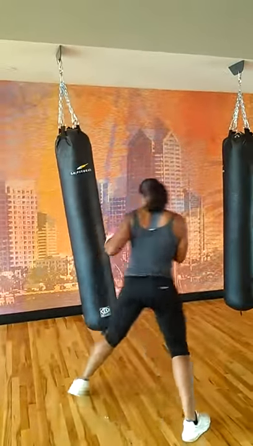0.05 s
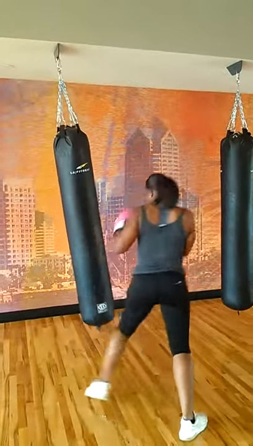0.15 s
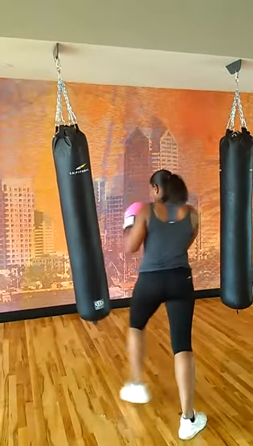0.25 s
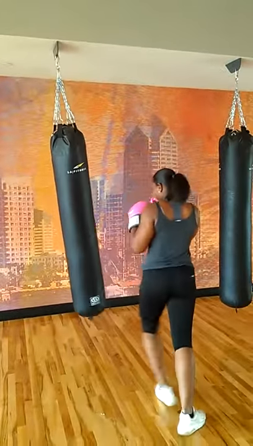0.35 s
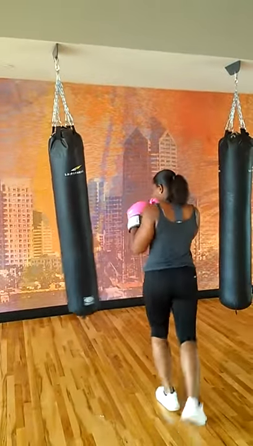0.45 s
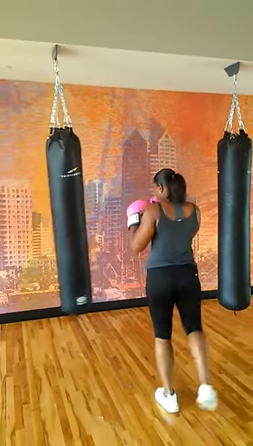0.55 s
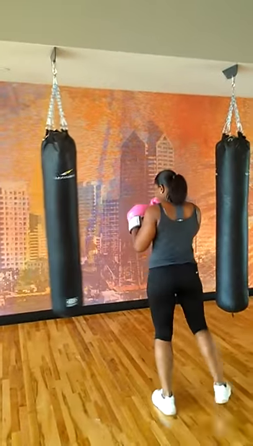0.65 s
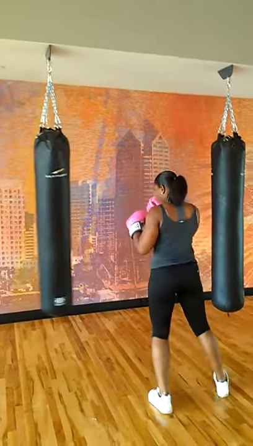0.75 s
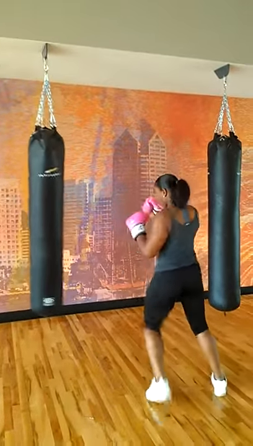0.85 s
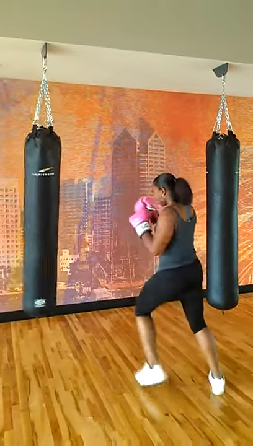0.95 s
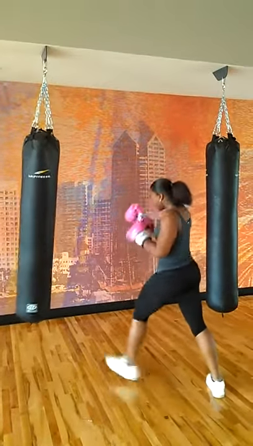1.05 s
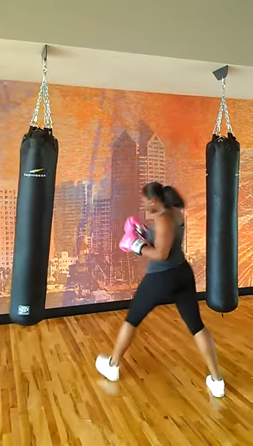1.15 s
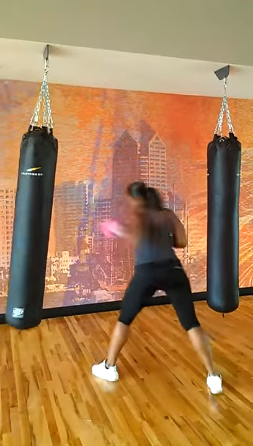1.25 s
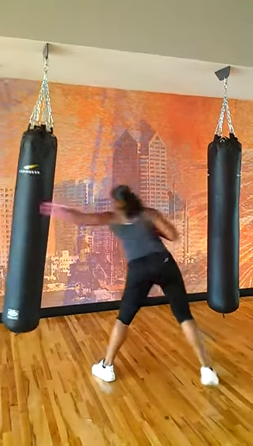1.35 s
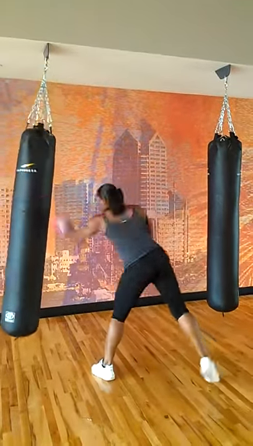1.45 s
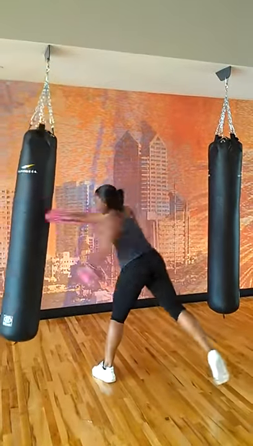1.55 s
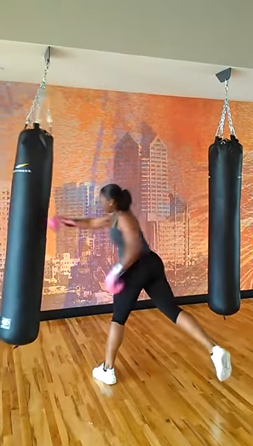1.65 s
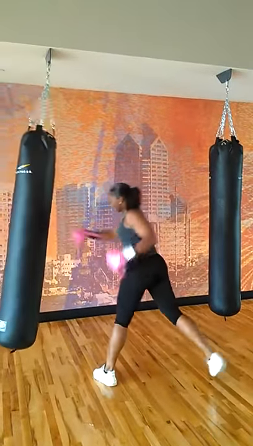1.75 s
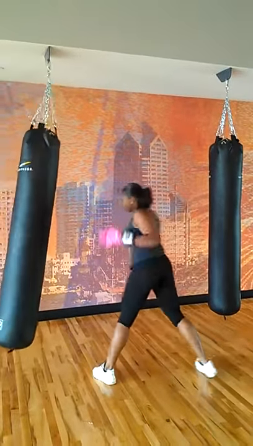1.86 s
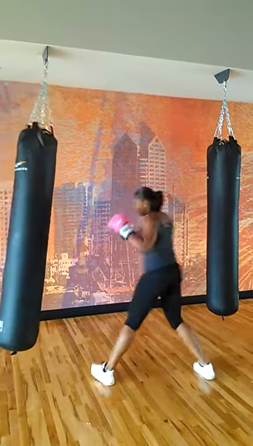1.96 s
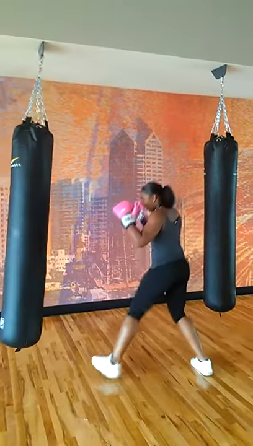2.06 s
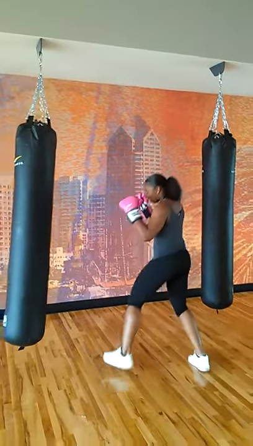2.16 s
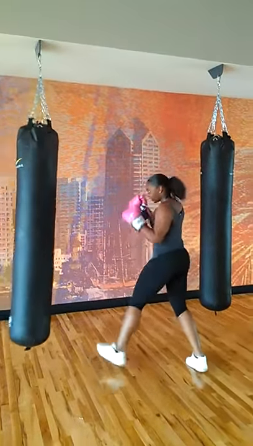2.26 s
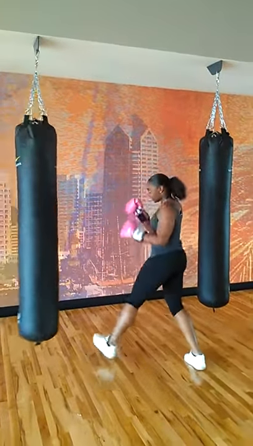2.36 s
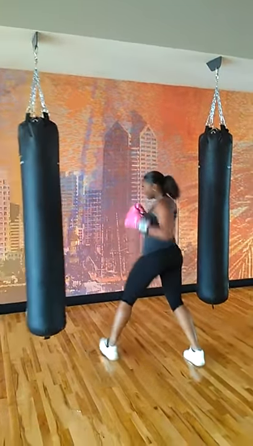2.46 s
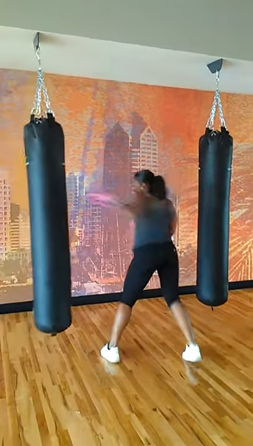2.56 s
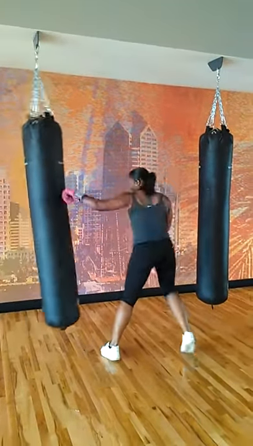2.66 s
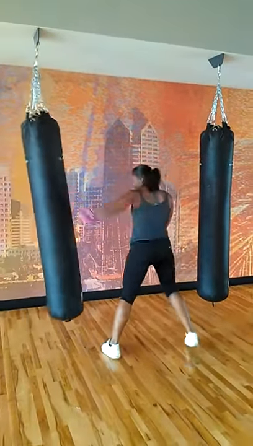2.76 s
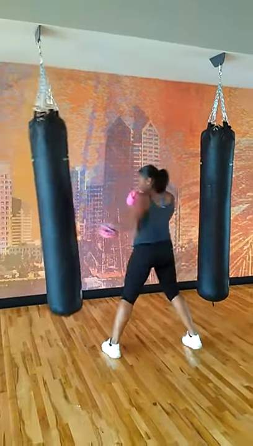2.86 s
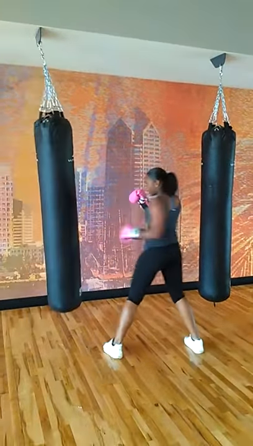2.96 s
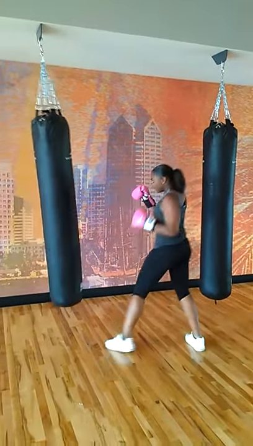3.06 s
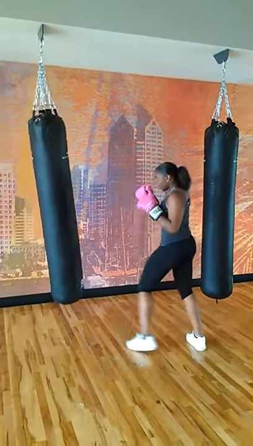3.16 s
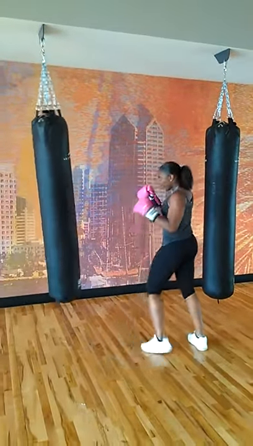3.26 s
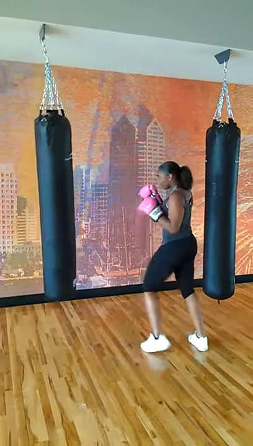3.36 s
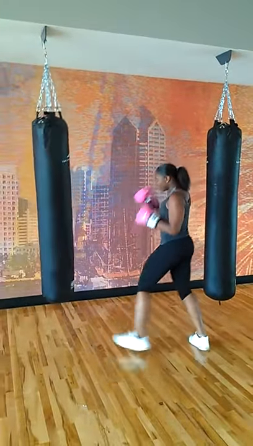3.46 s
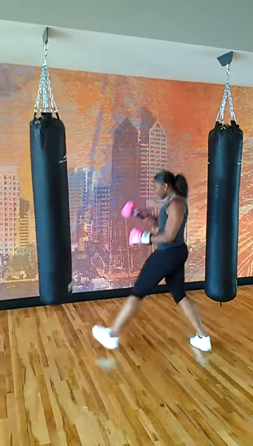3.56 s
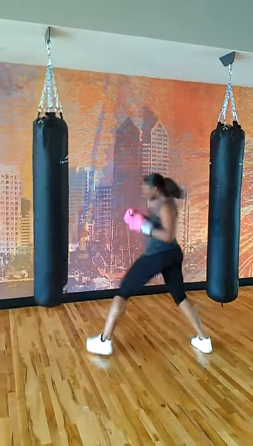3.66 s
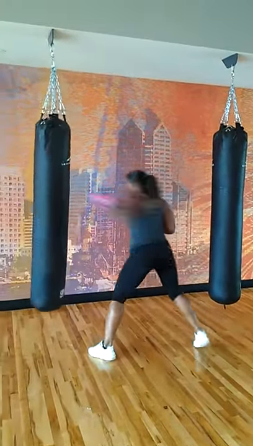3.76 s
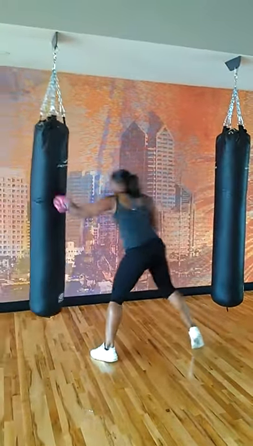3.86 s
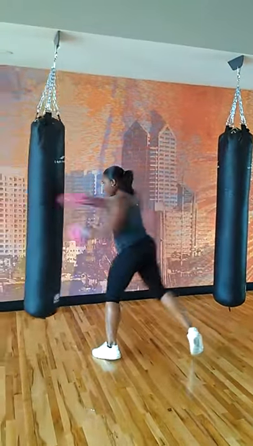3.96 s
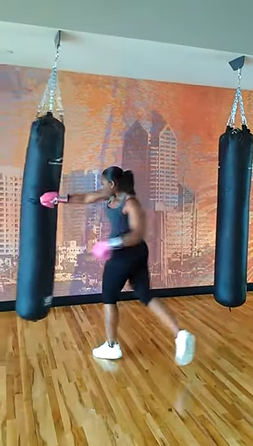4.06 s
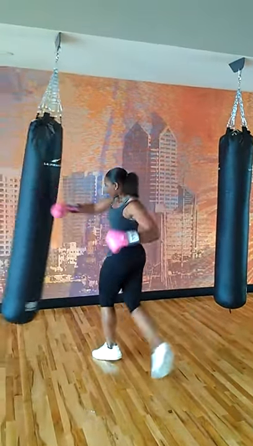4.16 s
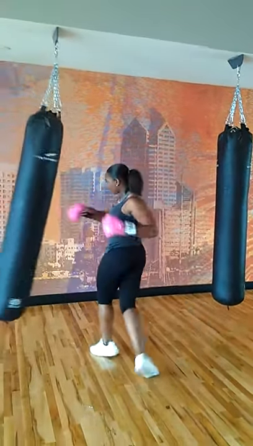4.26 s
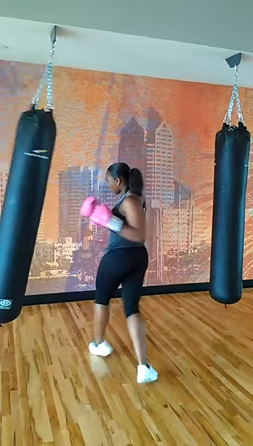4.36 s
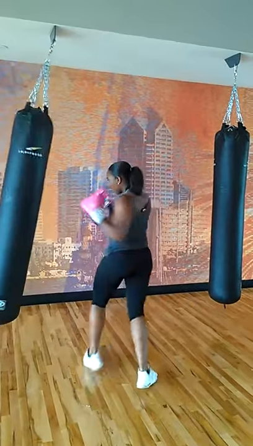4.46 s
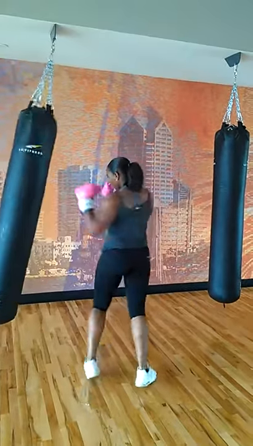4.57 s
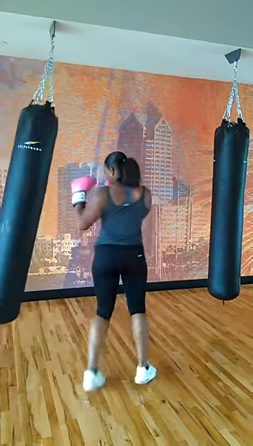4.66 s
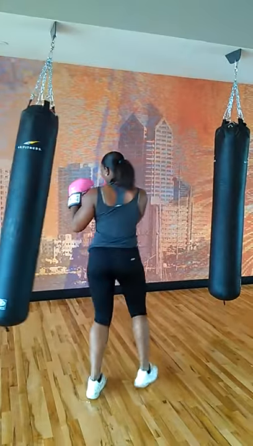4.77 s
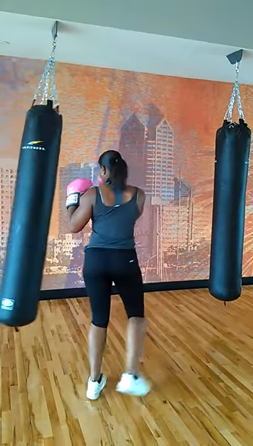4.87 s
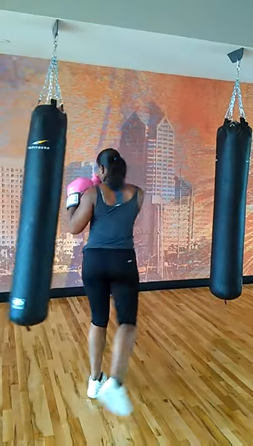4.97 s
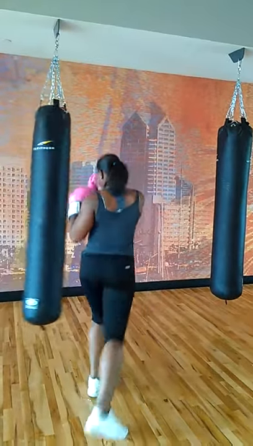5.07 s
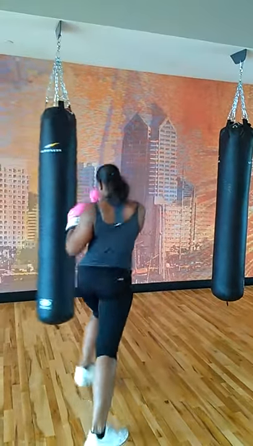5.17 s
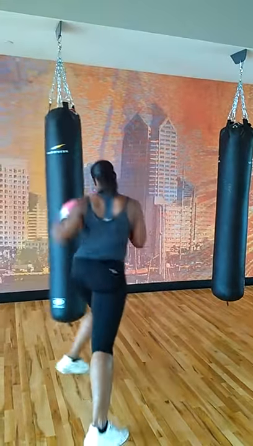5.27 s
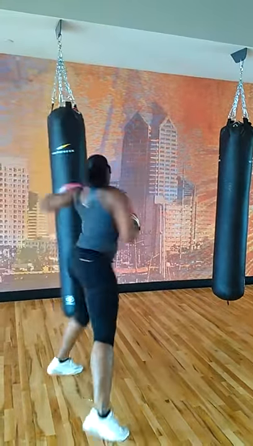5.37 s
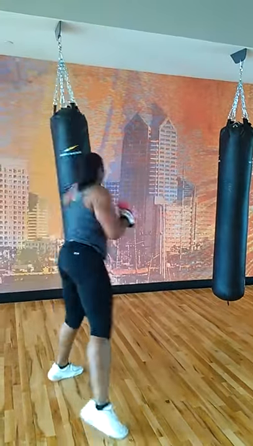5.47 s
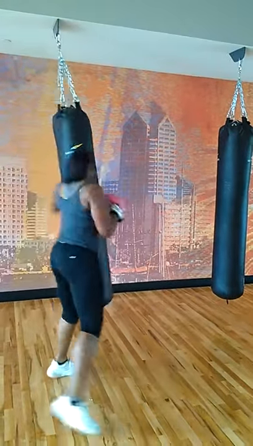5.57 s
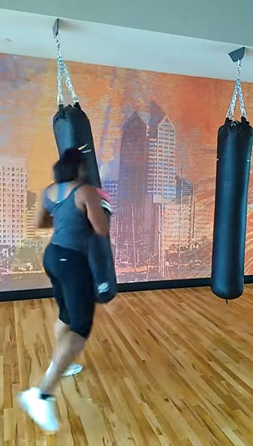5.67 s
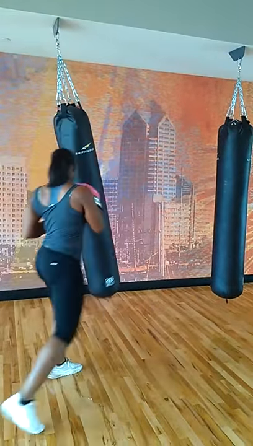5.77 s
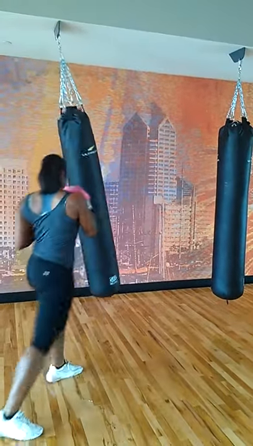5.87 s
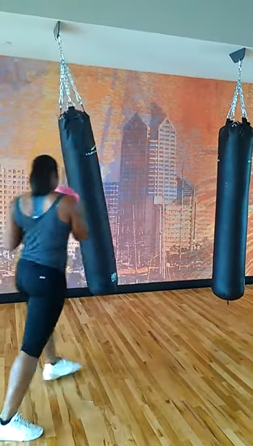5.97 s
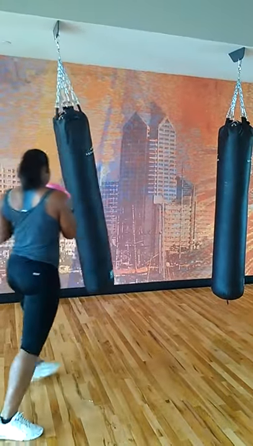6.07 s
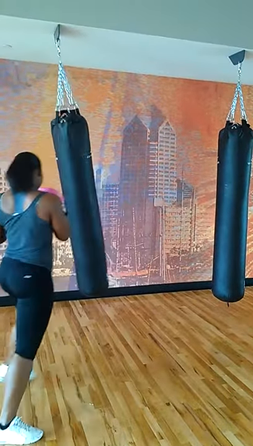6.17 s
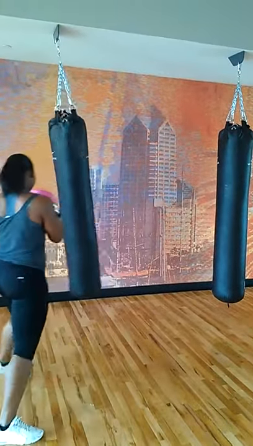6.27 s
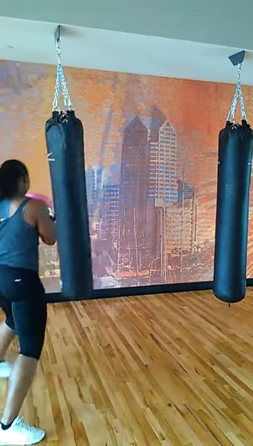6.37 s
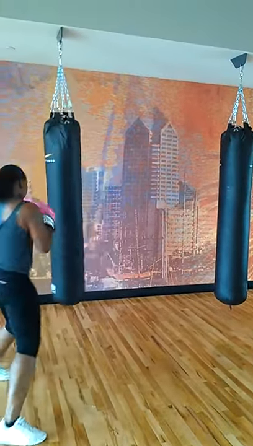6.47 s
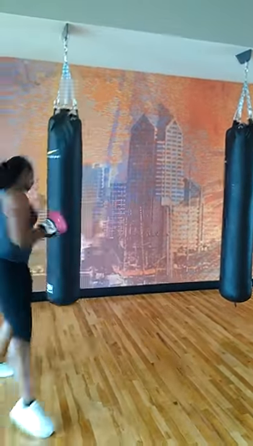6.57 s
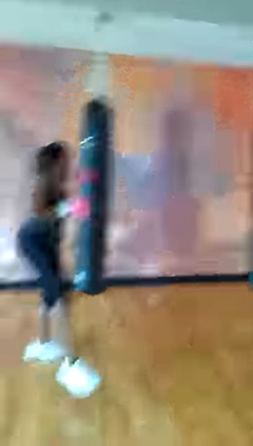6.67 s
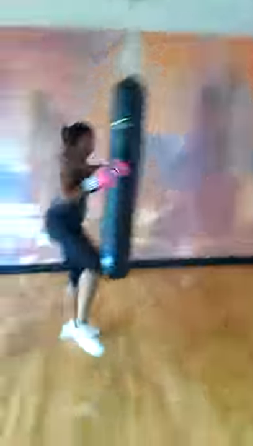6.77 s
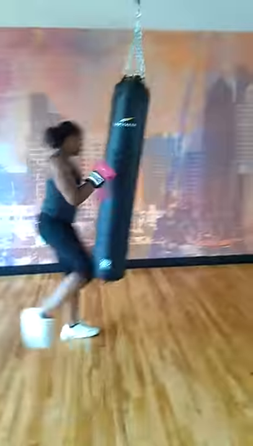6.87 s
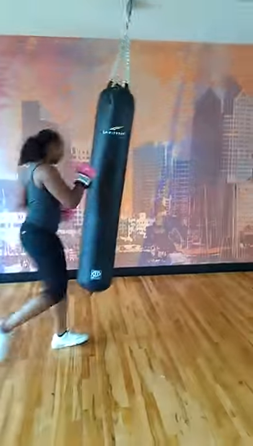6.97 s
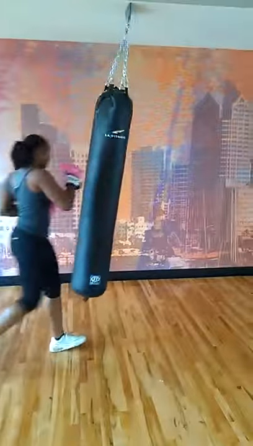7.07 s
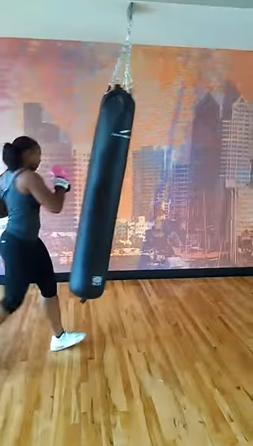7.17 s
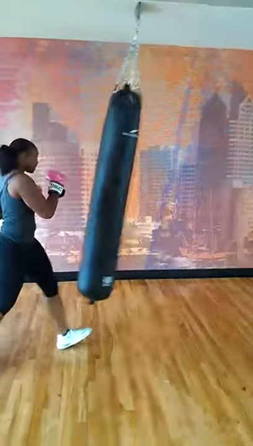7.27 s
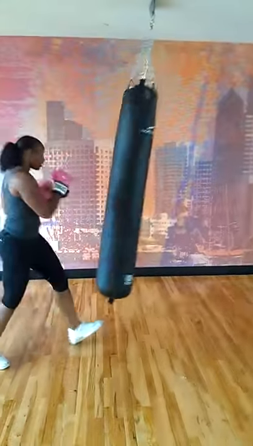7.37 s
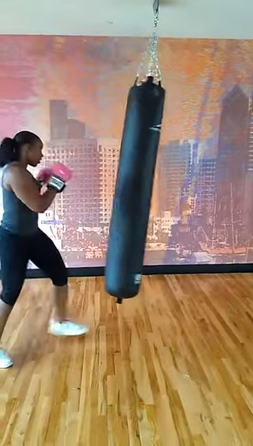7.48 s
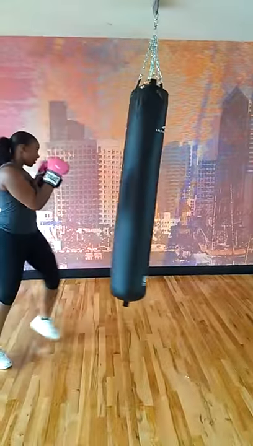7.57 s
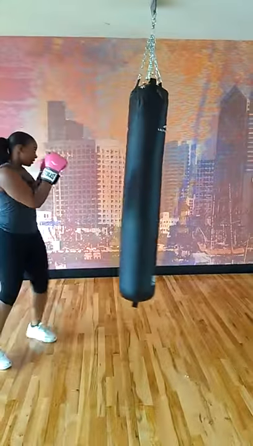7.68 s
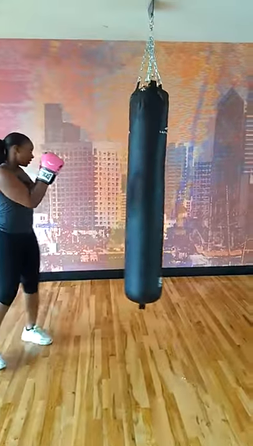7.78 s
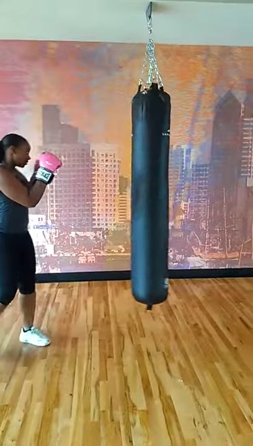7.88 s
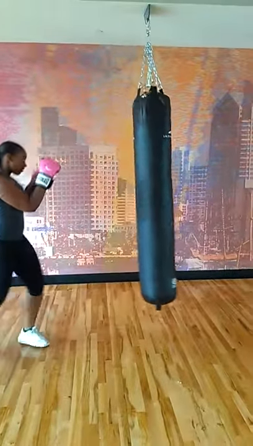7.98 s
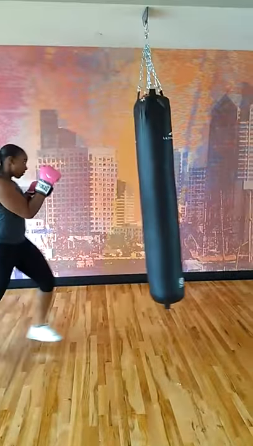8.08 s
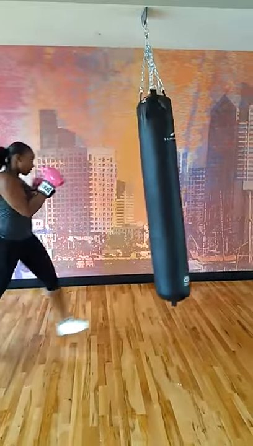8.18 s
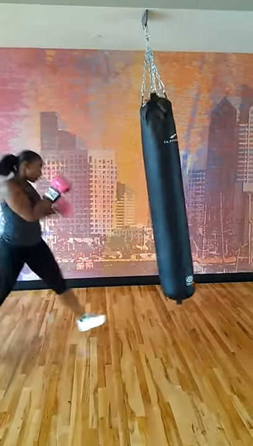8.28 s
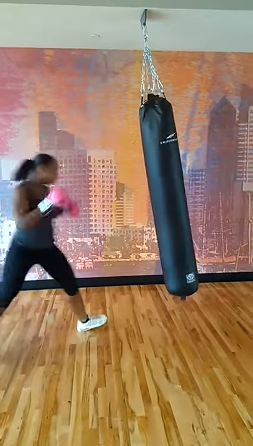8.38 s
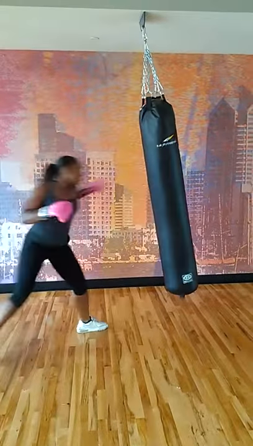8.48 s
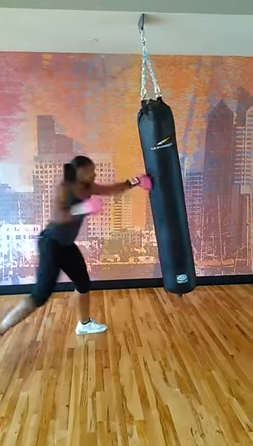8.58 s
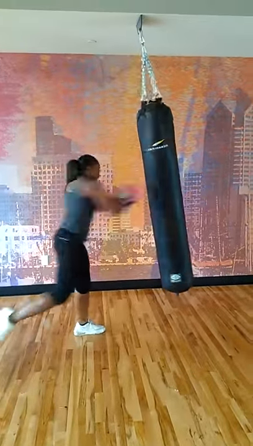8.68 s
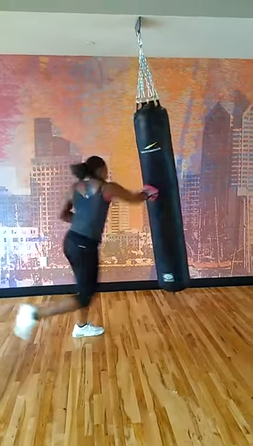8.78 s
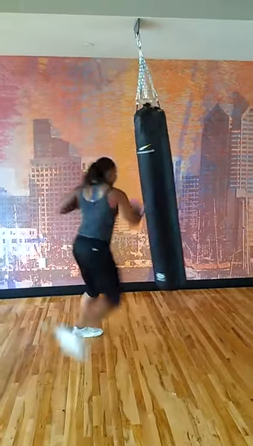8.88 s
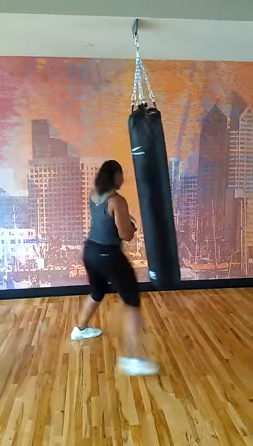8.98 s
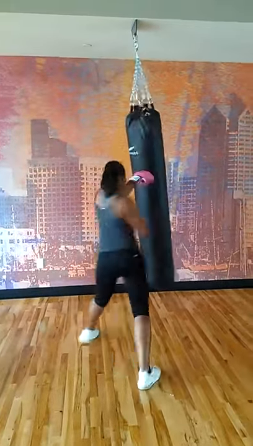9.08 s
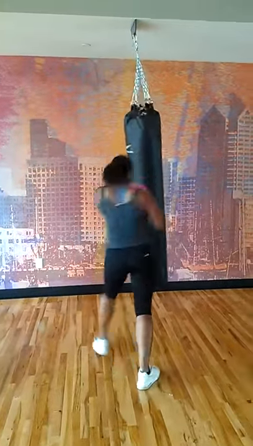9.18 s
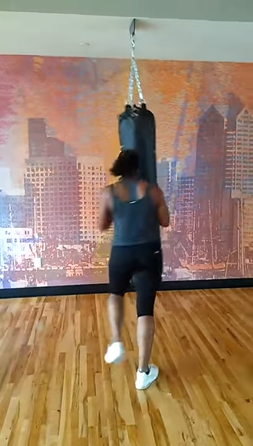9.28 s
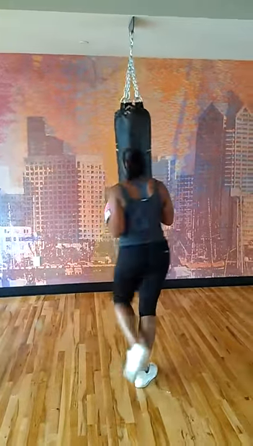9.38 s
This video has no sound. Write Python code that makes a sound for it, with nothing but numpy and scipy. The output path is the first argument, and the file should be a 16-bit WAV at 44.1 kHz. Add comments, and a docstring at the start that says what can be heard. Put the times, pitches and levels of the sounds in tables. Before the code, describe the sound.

A bare, hard-walled gym with a wooden floor, heard in wide stereo from a phone a few metres away. At the start the tail of an earlier blow dies away, with faint chain chafing and a light scuff. Soft steps around 1.2 lead to a quick double punch at 1.4 and 1.6. A firmer single lands at 2.65, chains rattling at 2.95. Steps, scuffs and toe taps from 3.1 to 3.8 precede the hardest, loudest blow at 3.87, its cover creasing afterwards and chains ticking near 4.4. A slide at 4.9, then another hit at 5.47. A tiny high sole squeak at 6.44, then a strong smack at 6.73. A quieter break holds sparse steps and a scuff near 8.0, before a lighter flurry at 8.6, 8.77 and 9.06. Each punch is slap, thud, crunch and springy rebound, with clothes rustling.

```python
"""A boxer punches a hanging heavy bag in a bare gym with a wooden floor, a few metres from a phone.
The gym still rings from an earlier blow; the chains tick and chafe as the bag swings, soles scuff and step.
Each blow then slaps the vinyl, thuds into the bag, crunches its filling and springs back, amid rustling clothes.
Between blows toes tap, the cover creases and, later on, one sole squeaks.
Sources are shaped noise or tones; hard walls throw them back and the phone widens the stereo image."""
import sys
import numpy as np
from scipy import signal
from scipy.fft import rfft, irfft, next_fast_len
from scipy.io import wavfile
from scipy.ndimage import uniform_filter1d

SR = 44100
rng = np.random.default_rng(int(sys.argv[2]) if len(sys.argv) > 2 else 0)


def unload_audio(sound):
    """Save the sound as a 16-bit wav file, at the path given as the first command line argument."""
    columns = np.transpose(np.atleast_2d(sound))
    # keep every value between -1 and 1, then stretch to whole-number steps
    steps = np.round(np.clip(columns, -1, 1) * 32767)
    wavfile.write(sys.argv[1], SR, steps.astype(np.int16))


N = 416304
LEAD = SR  # samples; the scene starts a second early, so the room already rings
SPOTS = 4  # sounding places, each with its own path through the room

# gloves hitting the bag: start_s, slap_db, thud_db, crunch_db
PUNCHES = [(-.5, 13.5, 4, 11), (1.4212, 9, 1.5, 13), (1.604, 10.5, -8.5, 0), (2.6478, 13.5, 5.5, 17),
           (3.865, 17, 12, 20), (5.465, 10.5, 2, 17.5), (6.729, 15.5, 3.5, 17.5), (8.606, 9, 1.5, 0),
           (8.767, 11.5, -5.5, 9.5), (9.061, 6, 0.5, 7)]


def amp(db):
    """Decibels to gain."""
    return 10 ** (np.asarray(db) / 20)


def unit(x):
    """Scale to an energy of one."""
    return x / np.sqrt(np.sum(x ** 2))


def gains(points, size):
    """Gain at each transform bin of a (freq_hz, level_db) spectrum, interpolated over log frequency."""
    hz, db = np.transpose(points)
    bin_hz = np.arange(size // 2 + 1) * SR / size
    return amp(np.interp(np.log(bin_hz + 1), np.log(hz), db))


def shade(x, points):
    """Filter by a spectrum without shifting phase."""
    size = 2 * next_fast_len(len(x) // 2 + 2048, True)
    return irfft(rfft(x, size) * gains(points, size), size)[:len(x)]


def colour(x, points, size=2048):
    """Causal minimum-phase filter of unit energy, so attacks stay sharp."""
    cepstrum = irfft(np.log(gains(points, size)))
    # fold the cepstrum onto positive time
    cepstrum[1:size // 2] *= 2
    cepstrum[size // 2 + 1:] = 0
    response = unit(irfft(np.exp(rfft(cepstrum))))
    return signal.oaconvolve(np.atleast_2d(x), response[None], axes=1)[:, :x.shape[-1]]


def add(track, start_s, sound):
    """Mix a sound into a track at its time."""
    i = LEAD + int(start_s * SR)
    track[i:i + len(sound)] += sound[:len(track) - i]


def grains(swell_s, decay_s, spread_db, patchy_db=0):
    """Tiny clicks of uneven size that swell and die away, optionally bunched into patches of milliseconds."""
    t = np.arange(SR // 3) / SR
    envelope = np.minimum(t / swell_s, 1) * np.exp(-np.maximum(t - swell_s, 0) / decay_s)
    sizes = amp(spread_db * np.minimum(rng.exponential(size=len(t)), 5))
    patches = uniform_filter1d(rng.standard_normal(len(t)), size=128)
    patch_gain = amp(patchy_db * patches / patches.std())
    return unit(envelope * sizes * patch_gain * rng.standard_normal(len(t)))


def bursts(events, swell_share, spread_db):
    """A burst of small contacts for each event; its swell is a share of its decay."""
    track = np.zeros(LEAD + N)
    for s, db, decay_s in events:
        add(track, s, amp(db) * grains(swell_share * decay_s, decay_s, spread_db))
    return track


def scatter(track):
    """Share samples at random among several spots on the bag or floor, one row a spot."""
    spot_of_sample = rng.integers(SPOTS, size=len(track))
    return track * (spot_of_sample == np.arange(SPOTS)[:, None])


def room_hush():
    """Faint air of the room: steady coloured noise."""
    # freq_hz, level_db
    hush_spectrum = [(30, -12), (140, -12), (270, 0), (1000, -6), (2000, -7), (3000, -11), (9000, -14),
                     (13000, -28)]
    return amp(-86) * colour(rng.standard_normal(N), hush_spectrum)[0]


def chains():
    """Steel links tick on each other; after each blow they chafe in one narrow ring as the bag swings."""
    # chains snatching at their hook: start_s, level_db, decay_s
    snatches = [(.135, -26, 0.05), (1.88, -18, 0.031), (2.93, 0.5, 0.034), (2.955, -2.5, 0.031),
                (2.974, -3, .0038), (4.353, -9.5, .003), (4.48, -16, 0.087), (4.855, -21, .025),
                (5.768, -12.5, .015), (5.795, -7.5, 0.0024), (6.012, -23.5, 0.0074)]
    # links, then ring of the hook: freq_hz, level_db
    link_spectrum = [(60, -47), (170, -18), (350, -3), (1400, -3.5), (2200, 4.5), (3000, -10.5),
                     (6000, -1.5), (7000, -2), (7900, 7), (9500, -1), (13000, -22)]
    hook_spectrum = [(1200, -46), (1800, -16), (2050, 1.5), (2350, -2), (2700, -23), (4000, -51)]
    chafe_db, chafe_t60_s = -71, 1.49  # level against the crunch; time to fall 60 dB
    chafing, t = np.zeros(LEAD + N), np.arange(3 * SR) / SR
    slowing = np.exp(-np.log(1000) * (t / chafe_t60_s) ** 2)
    for s, _, _, crunch_db in PUNCHES:
        add(chafing, s, amp(chafe_db + crunch_db) * slowing * rng.standard_normal(len(t)))
    ticks = bursts(snatches, swell_share=0.66, spread_db=4.0)
    return colour(scatter(ticks), link_spectrum) + colour(scatter(chafing), hook_spectrum)


def clothes():
    """Clothes and gloves rustle from each wind-up until the boxer settles, louder for heavy thuds."""
    rustle_db, rustle_db_per_thud_db = -71, .9
    wind_up_s, settle_s, fade_db_per_s = .19, .9, 89.5
    t = np.arange(-LEAD, N) / SR
    effort = np.zeros(len(t))
    for s, _, thud_db, _ in PUNCHES:
        resting_s = np.maximum(np.maximum(s - wind_up_s - t, t - s - settle_s), 0)
        level_db = rustle_db + rustle_db_per_thud_db * thud_db - fade_db_per_s * resting_s
        effort = np.maximum(effort, amp(level_db))
    return effort * rng.standard_normal(len(t))


def footwork():
    """Soles slide, steps roll and toes tap on the boards; clothes rustle with the colour of the soles."""
    # soles sliding over the varnish: start_s, level_db, decay_s
    scuffs = [(.435, -29, .03), (1.232, -32.5, .028), (2.245, -28, .02), (3.21, -12, .02),
              (3.577, -18.5, .015), (4.92, -27, .15), (6.232, -28.5, .029), (8.034, -16, .007),
              (8.058, -16, .055)]
    # sneakers landing and rolling: start_s, level_db, decay_s
    steps = [(1.12, -40.5, .1), (1.2, -30, .09), (1.975, -16.5, 0.0096), (2.52, -25.5, 0.086),
             (3.14, -9, 0.058), (3.31, -15.5, 0.14), (3.576, -14.5, .07), (5.145, -20, 0.075),
             (6.43, -19.5, .11), (7.28, -23.5, 0.018), (7.878, -14, 0.084), (8.48, -28.5, 0.13)]
    # toes on the boards: start_s, level_db
    taps = [(3.727, -8.5), (3.76, -12.5), (5.356, -25.5), (6.43, -30), (9.008, -13)]
    # sliding sole, boards, hollow knock of a toe: freq_hz, level_db
    sole_spectrum = [(120, -21), (300, 4), (800, 0.5), (2200, 2), (3200, 0.5), (5500, -2), (9000, -2),
                     (12500, -21)]
    board_spectrum = [(90, -37.5), (190, -14.5), (300, 5), (500, -0.5), (780, 7), (1200, 0), (1700, -0.5),
                      (2200, 8), (2800, -4.5), (5000, -5), (9000, -5.5), (13000, -32)]
    toe_spectrum = [(150, -23.5), (400, -5), (900, 5), (1600, -1.5), (3700, -3.5), (5000, -10.5),
                    (12000, -26)]
    tap_decay_s, step_swell = .004, 0.21
    rubbing = bursts(scuffs, swell_share=.25, spread_db=1.5) + clothes()
    rolling = bursts(steps, step_swell, spread_db=7.5)
    tapping = bursts([(s, db, tap_decay_s) for s, db in taps], step_swell, spread_db=7.5)
    sliding_spots = colour(scatter(rubbing), sole_spectrum)
    step_spots = colour(scatter(rolling), board_spectrum)
    tap_spots = colour(scatter(tapping), toe_spectrum)
    return sliding_spots + step_spots + tap_spots


def squeeze():
    """The padding stiffens as it is crushed, so its rough hollow note climbs quickly."""
    start_hz, octave_s, attack_s, climb_s, decay_s = 330.4, .0145, 0.012, .038, 0.0053
    t = np.arange(SR // 8) / SR
    hz = start_hz * 2 ** (np.minimum(t, climb_s) / octave_s)
    envelope = np.minimum(t / attack_s, 1) * np.exp(-np.maximum(t - climb_s, 0) / decay_s)
    rough = uniform_filter1d(rng.standard_normal(len(t)), size=128)
    return unit(envelope * rough * np.sin(2 * np.pi * np.cumsum(hz) / SR))


def punches():
    """Glove slaps vinyl, bag thuds, filling crunches under the sinking fist, then the cover springs back."""
    # cover creasing as the bag recoils or a glove grazes it: start_s, level_db, decay_s
    creases = [(2.76, 8.5, 0.008), (3.945, 17, 0.023), (4.02, 13, .021), (5.577, 5.5, 0.0096),
               (6.836, 6, 0.025), (8.6, 3.5, 0.0023)]
    # vinyl, filled bag, flattened glove, filling: freq_hz, level_db
    slap_spectrum = [(90, -36.5), (200, -16), (300, 1.5), (500, -3.5), (780, 4), (1200, 2.5), (2000, 4.5),
                     (3000, 2), (5000, 1), (8000, 0.5), (10000, -2), (13000, -30)]
    thud_spectrum = [(70, -35), (130, -33), (210, -21.5), (300, 3.5), (420, 1), (700, 7.5), (1100, -4),
                     (3000, -20.5), (8000, -40.5)]
    knock_spectrum = [(100, -42.5), (350, -6), (750, -5.5), (1100, 1), (1800, 4), (2600, -1.5),
                      (6000, -13.5), (13000, -39.5)]
    crunch_spectrum = [(60, -51), (150, -37), (300, -8), (1000, -11), (2000, 3), (3000, 0.5), (5500, 2),
                       (7000, -3), (7900, 8), (8800, -0.5), (10300, -5), (13000, -26.5)]
    slap_decay_s, slap_doubling_db = 0.0048, 6.5  # decay at 0 dB crunch; extra crunch that doubles it
    flat_s, sink_s, rebound_s = .023, 0.034, .061  # padding flat, fist deepest, cover springs back
    crunch_decay_s, rebound_decay_s = 0.011, 0.0078
    squeeze_db, smack_db, knock_db, rebound_db = -12.5, -10, -15, -8  # against the crunch
    padding_low_hz = 383  # the padding note is cut below this

    slap, thud, knock, crunch, padding = np.zeros((5, LEAD + N))
    for s, slap_db, thud_db, crunch_db in PUNCHES:
        # a deeper blow keeps the glove on the vinyl longer
        slap_s = slap_decay_s * 2 ** (crunch_db / slap_doubling_db)
        add(slap, s, amp(slap_db) * grains(0.0027, slap_s, spread_db=2.5))
        add(thud, s, amp(thud_db) * grains(0.0067, 0.0019, spread_db=0.0))
        crushing = grains(sink_s, crunch_decay_s, spread_db=3.5, patchy_db=5.5)
        add(crunch, s, amp(crunch_db) * crushing)
        add(padding, s, amp(crunch_db + squeeze_db) * squeeze())
        # second contact, once the padding is flat
        smack = grains(.009, 0.014, spread_db=3, patchy_db=1.5)
        add(slap, s + flat_s, amp(crunch_db + smack_db) * smack)
        hollow = grains(0.0083, 0.0068, spread_db=4.0, patchy_db=4.5)
        add(knock, s + flat_s, amp(crunch_db + knock_db) * hollow)
        rebound = grains(0.0006, rebound_decay_s, spread_db=2.5)
        add(crunch, s + rebound_s, amp(crunch_db + rebound_db) * rebound)
    crunch += bursts(creases, swell_share=1, spread_db=6)

    layers = ((slap, slap_spectrum), (thud, thud_spectrum),
              (knock, knock_spectrum), (crunch, crunch_spectrum))
    spots = sum(colour(scatter(track), spectrum) for track, spectrum in layers)
    high_pass = signal.butter(6, padding_low_hz, "high", fs=SR, output="sos")
    spots[0] += signal.sosfilt(high_pass, padding)
    return spots


def thumps():
    """The whole bag gives way under each blow: one deep swing of pressure, too weak to stir the room."""
    thump_db, thump_hz, decay_s = -33.5, 57.4, 0.0026
    db_per_thud_db = 0.16  # the filling stiffens under harder blows
    track, t = np.zeros(LEAD + N), np.arange(SR // 4) / SR
    swing = unit(np.sin(2 * np.pi * thump_hz * t) * t * np.exp(-t / decay_s))
    for s, _, thud_db, _ in PUNCHES:
        add(track, s, amp(thump_db + db_per_thud_db * thud_db) * swing)
    return track[LEAD:]


def squeaks(waver=0.008):
    """Rubber sticks and slips on the floor at a high, unsteady rate: a sine of wavering pitch."""
    # start_s, pitch_hz, level_db, decay_s
    squeak_events = [(6.437, 6130, -17, .014)]
    track, t = np.zeros(LEAD + N), np.arange(SR // 2) / SR
    for s, hz, db, decay_s in squeak_events:
        drift = uniform_filter1d(rng.standard_normal(len(t)), size=96)
        phase = 2 * np.pi * np.cumsum(hz * (1 + waver * drift / drift.std())) / SR
        envelope = (1 - np.exp(-t / .002)) * np.exp(-t / decay_s)
        add(track, s, amp(db) * unit(np.sin(phase) * envelope))
    return track


def gym_echoes():
    """For each spot: scattered first returns and a diffuse tail whose bands each decay in two stages."""
    # reverberation: freq_hz, early_t60_s, late_t60_s, late_share_db
    gym_bands = [(147, 0.2, 2.1, -15.5), (370, 0.91, 1.59, -9), (570, 0.22, 1.2, -7),
                 (734, 0.18, 1.346, -7.5), (1110, 0.32, 1.19, -10), (1840, 0.18, 1.074, -8.5),
                 (2200, .42, 0.99, -14), (2550, 0.28, 1.093, -11.5), (6500, 0.42, 1, -15.5),
                 (7400, 0.32, 1.1, -18), (13400, 0.36, 1.2, -25.5)]
    # returns from ceiling and walls: delay_s, level_db against the direct sound
    first_returns = [(.005, -3.5), (.012, -2), (.022, -9), (.033, -12), (.041, -12), (.063, -11)]
    diffuse_db, build_s, scatter_s = -0.5, 0.016, 0.0036
    size = 65536
    t = np.arange(size) / SR
    hz, *columns = np.transpose(gym_bands)
    log_bins = np.log(np.arange(size // 2 + 1) * SR / size + 1)
    noise, tails = rfft(rng.standard_normal((SPOTS, size))), 0
    # overlapping triangular bands, one a table row
    for share, early_s, late_s, late_db in zip(np.eye(len(hz)), *columns):
        band = irfft(noise * np.interp(log_bins, np.log(hz), share))
        decay = np.hypot(amp(-60 * t / early_s), amp(late_db - 60 * t / late_s))
        tails = tails + band * decay
    build_up = 1 - np.exp(-t / build_s)
    responses = np.array([amp(diffuse_db) * unit(tail * build_up) for tail in tails])
    for response in responses:
        for s, db in first_returns:
            i = int(s * SR)
            response[i:i + SR // 3] += amp(db) * grains(0.0001, scatter_s, spread_db=5.5)
    return responses


def heard(spots, paths):
    """Sum of all spots, each by way of its own unit-energy path through the room."""
    paths = np.array([unit(path) for path in paths])
    return signal.fftconvolve(spots, paths, axes=1).sum(axis=0)[LEAD:LEAD + N]


def scene():
    """Sources reach two microphone ports directly and by way of the room; thumps and hush bypass the room."""
    # share of the sound that differs between the ports: freq_hz, level_db
    port_difference = [(200, -12), (1000, -8), (3000, -11), (10000, -9)]
    thump_side = 1.1  # gain in the side channel; thumps are far stronger at the left port
    spots = chains() + footwork() + punches()
    spots[0] += squeaks()
    echoes = gym_echoes()
    direct = signal.unit_impulse(echoes.shape[1])
    deep = thumps()
    mid = heard(spots, direct + echoes) + deep + room_hush()
    # the difference of the ports uses each spot's neighbouring path
    side = shade(heard(spots, np.roll(echoes, 1, axis=0)), port_difference)
    side = side + thump_side * deep
    return np.array([mid + side, mid - side])


def record(dry):
    """The phone widens the image with short delays of opposite sign, clips the highest peaks, cuts the top."""
    # delayed copies in the side channel: freq_hz, level_db
    short_spectrum = [(60, -5.5), (150, -4), (300, 0), (1000, -4), (2500, -2), (5000, -4.5), (10000, -8.5)]
    long_spectrum = [(1000, -32), (3000, -14.5), (6000, -7.5), (10000, -6)]
    short_lag_samples, long_lag_samples, top_hz = 72, 179, 13400
    mid = dry.mean(axis=0)
    short = np.pad(mid, (short_lag_samples, 0))[:N]
    long = np.pad(mid, (long_lag_samples, 0))[:N]
    side = shade(long, long_spectrum) - shade(short, short_spectrum)
    wide = np.clip(dry + np.array([side, -side]), -.9, .9)
    low_pass = signal.ellip(8, .2, 70, top_hz, fs=SR, output="sos")
    return signal.sosfilt(low_pass, wide)


dry = scene()
out = record(dry)
unload_audio(out)
```